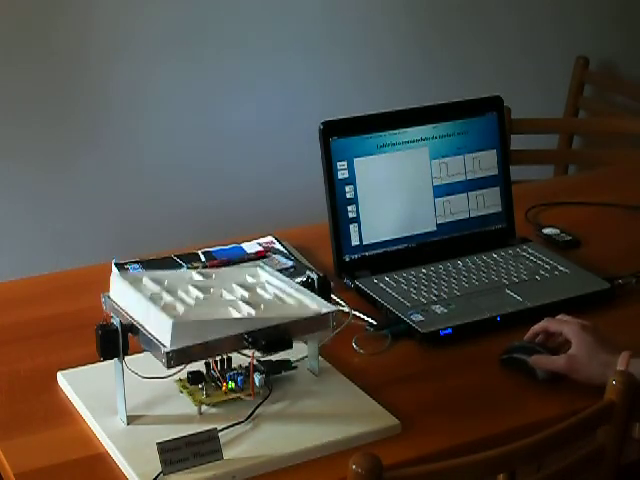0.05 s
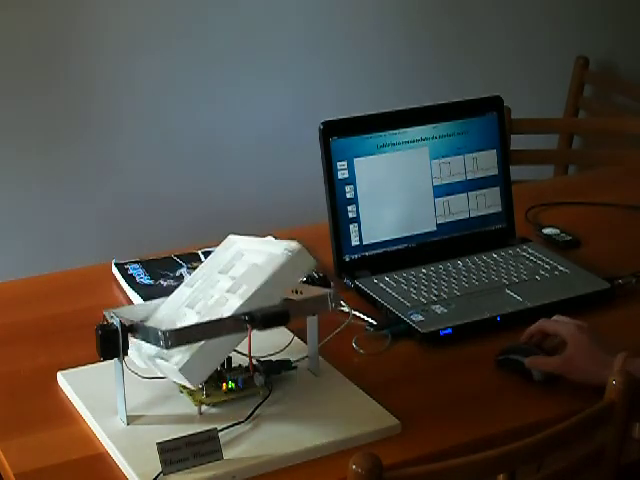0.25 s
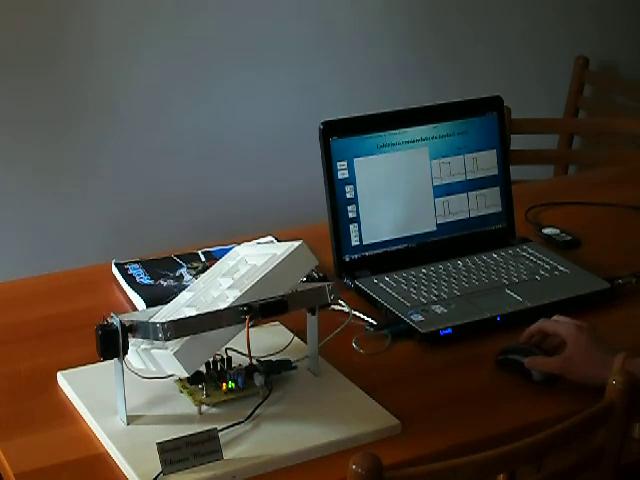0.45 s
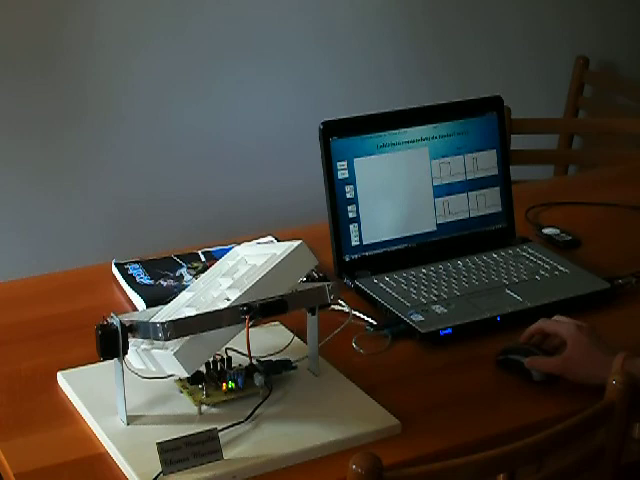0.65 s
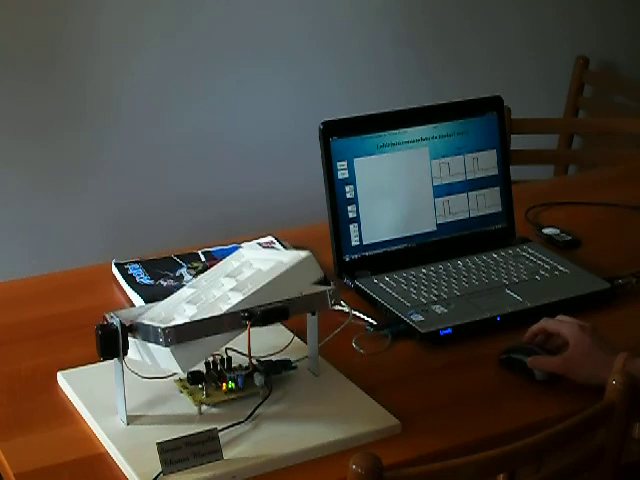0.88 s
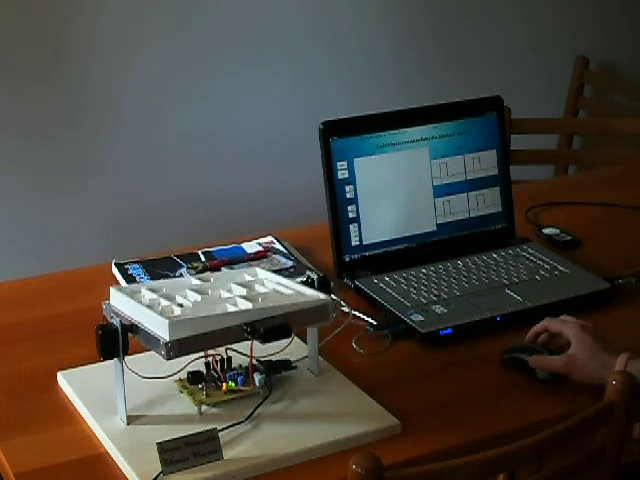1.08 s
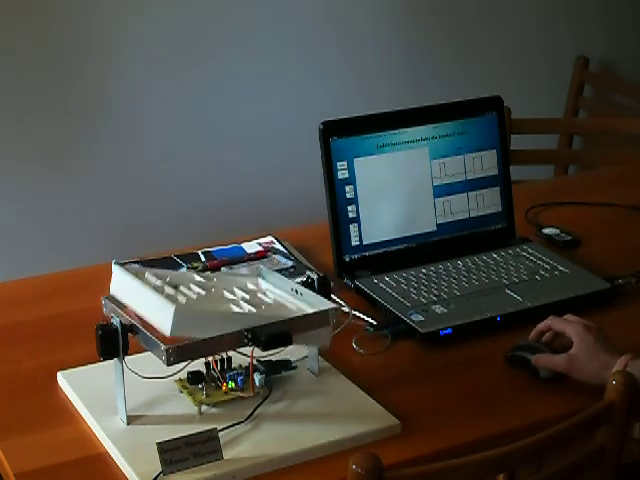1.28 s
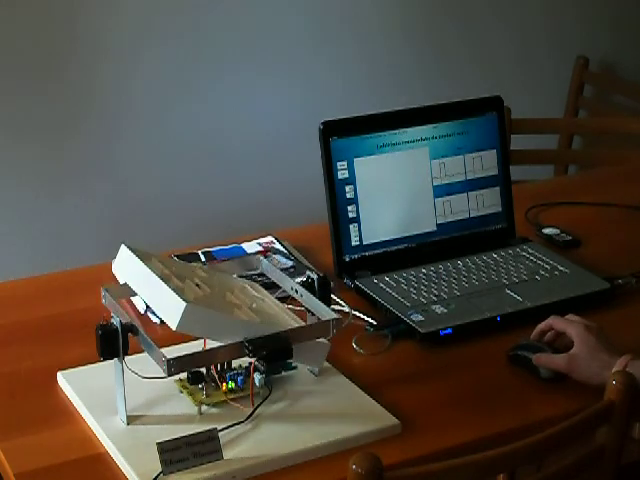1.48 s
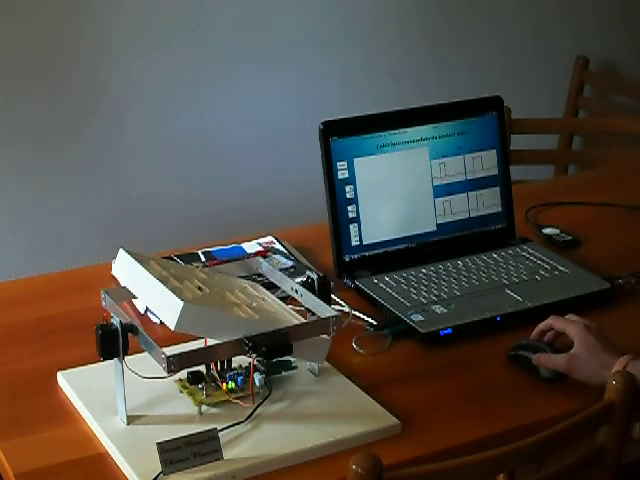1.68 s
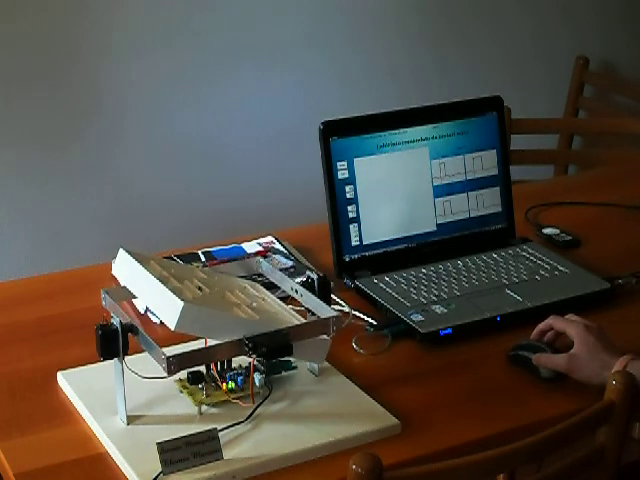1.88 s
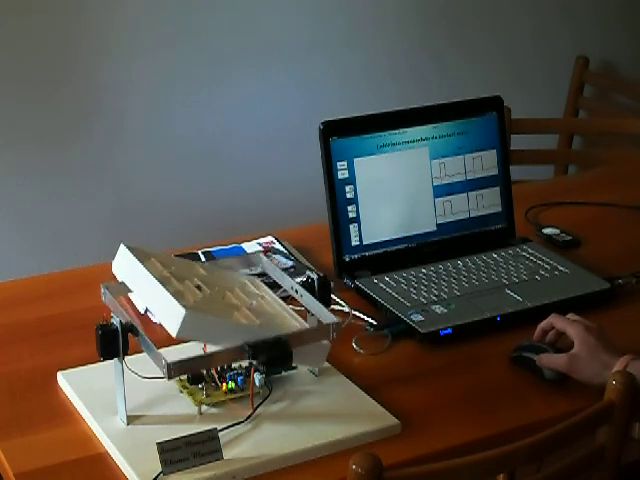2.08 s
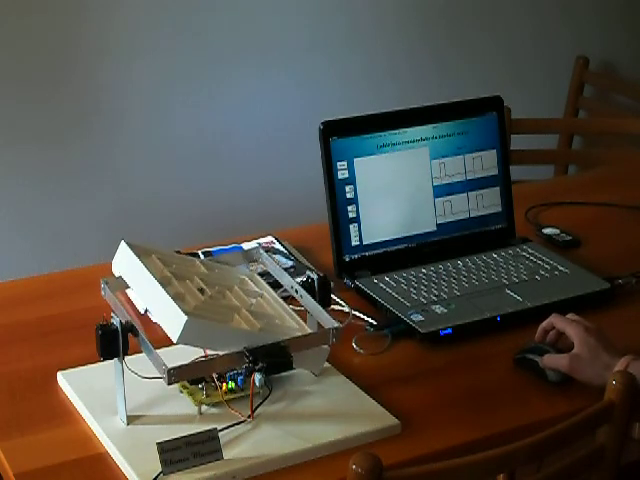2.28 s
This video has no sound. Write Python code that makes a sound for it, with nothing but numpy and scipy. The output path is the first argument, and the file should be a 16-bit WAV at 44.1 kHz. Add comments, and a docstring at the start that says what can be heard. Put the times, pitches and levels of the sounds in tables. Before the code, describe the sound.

Sharp knocks and rumble of a ball in a tilting maze, with brief motor whirring.

```python
"""Servo-driven ball maze.

Two small servos tilt a maze tray in a bare, echoing room; their gear teeth whirr in plastic cases.
A ball rumbles over the rough tray, scrapes along a wall and knocks against the walls,
each blow ringing the tray and followed by a quick rebound.
Underneath: low hum, faint hiss and a thin electronic whine."""
import sys
import numpy as np
from scipy import signal
from scipy.fft import rfft, irfft, next_fast_len
from scipy.io import wavfile
from scipy.ndimage import map_coordinates

SR = 44100
rng = np.random.default_rng(int(sys.argv[2]) if len(sys.argv) > 2 else 0)


def generate_wav(sig):
    """Save sig (samples, or channels by samples) to the path in sys.argv[1] as 16-bit PCM at SR."""
    pcm = np.round(np.clip(np.atleast_2d(sig).T, -1, 1) * 32767).astype(np.int16)
    wavfile.write(sys.argv[1], SR, pcm)


N = 108045
TIME_S = np.arange(N) / SR


def amp(db):
    """Decibels to gain."""
    return 10 ** (np.asarray(db) / 20)


def unit_rms(x):
    """Scale to rms 1."""
    return x / np.sqrt(np.mean(x ** 2) + 1e-20)


def curve(points, hz):
    """Interpolate (frequency [Hz], value) points on a log axis."""
    freqs, values = np.transpose(points)
    return np.interp(np.log(hz + 1), np.log(freqs + 1), values)


def bell(hz, centre_hz, octaves):
    """Gaussian of height 1 on a log-frequency axis."""
    return np.exp(-.5 * (np.log2((hz + 1) / centre_hz) / octaves) ** 2)


def envelope(points):
    """Gain per sample from (time [s], level [dB]) points."""
    return amp(np.interp(TIME_S, *np.transpose(points)))


def wobble(knots_per_s):
    """Smooth random curve."""
    return map_coordinates(rng.standard_normal(1000), [knots_per_s * TIME_S], mode="wrap")


def coloured(x, db_at):
    """Minimum-phase filter with gain db_at(hz)."""
    size = 2 * next_fast_len(len(x))
    hz = np.fft.rfftfreq(size, 1 / SR)
    cepstrum = irfft(np.log(amp(db_at(hz))))
    cepstrum[1:size // 2] *= 2
    cepstrum[size // 2 + 1:] = 0
    return irfft(rfft(x, size) * np.exp(rfft(cepstrum)))[:len(x)]


# Hiss spectrum: (frequency [Hz], gain [dB])
HISS_SPECTRUM = [(20, -2.5), (45, 5), (90, -0.5), (200, -7), (400, -13.5), (1000, -16), (2000, -19),
                 (3200, -20), (5000, -22), (10000, -22.5)]
# Hum and whine partials: (frequency [Hz], rms level [dB])
HUM_TONES = [(30, -50.5), (60, -66.5), (126, -76.5)]
WHINE_TONES = [(7140, -65.5), (7852, -63), (7882, -79), (7912, -86)]


def background(hiss_db=-52, waver_rad=0.11):
    """Steady hiss under a hum and whine that waver slightly in phase."""
    hiss = coloured(rng.standard_normal(N), lambda hz: curve(HISS_SPECTRUM, hz))
    out = amp(hiss_db) * unit_rms(hiss)
    for hz, db in HUM_TONES + WHINE_TONES:
        waver = waver_rad * wobble(knots_per_s=6.3)
        phase = 2 * np.pi * (hz * TIME_S + rng.random())
        out += amp(db) * np.sqrt(2) * np.sin(phase + waver)
    return out


# Room decay: (frequency [Hz], T60 [s])
ROOM_DECAY = [(200, 0.35), (700, 0.55), (3000, 0.62), (6000, 0.52), (10000, 0.53)]


def room_tail(build_s=0.0054):
    """Diffuse echo of energy 1, lasting longest near 3 kHz."""
    hz, t, spectra = signal.stft(rng.standard_normal(SR), SR, nperseg=256)
    decay = amp(-60 * t / curve(ROOM_DECAY, hz)[:, None])
    tail = signal.istft(spectra * decay, SR, nperseg=256)[1][:SR]
    tail *= 1 - np.exp(-TIME_S[:SR] / build_s)
    return tail / np.linalg.norm(tail)


def in_room(x, wet_db):
    """Direct sound plus echo, at the same total power."""
    echo = signal.fftconvolve(x, room_tail())[:N]
    return (x + amp(wet_db) * echo) / np.hypot(1, amp(wet_db))


# Whirr envelope: (time [s], level [dB])
SERVO_LEVEL = [(0, -60), (.07, -50), (.08, -40), (.105, -45.5), (.112, -35), (.132, -37.5), (.175, -33),
               (.235, -33), (.26, -37.5), (.33, -42.5), (.4, -73), (2.0, -89), (2.027, -49), (2.065, -74),
               (2.082, -39), (2.125, -50), (2.158, -42), (2.2, -57), (2.3, -84)]
# Gear spectrum: (frequency [Hz], gain [dB])
GEAR_SPECTRUM = [(300, -36), (1800, -24.5), (2900, -8.5), (5200, -7), (5700, 2), (6200, 2), (6700, -2.5),
                 (8200, -4), (9500, 2), (10200, -1.5)]


def servos(teeth_per_s=950, tooth_scatter=0.31, case_t60_s=0.0064, flutter_db=1.5):
    """Each uneven gear tooth rasps briefly in the small plastic case; the load flutters."""
    gaps_s = np.exp(tooth_scatter * rng.standard_normal(4000)) / teeth_per_s
    onsets = (np.cumsum(gaps_s) * SR).astype(int)
    teeth = np.bincount(onsets, minlength=N)[:N]
    case_decay = amp(-60 * TIME_S[:SR] / case_t60_s)
    rasp = signal.fftconvolve(teeth, case_decay)[:N] * rng.standard_normal(N)
    whirr = unit_rms(coloured(rasp, lambda hz: curve(GEAR_SPECTRUM, hz)))
    flutter = amp(flutter_db * wobble(knots_per_s=90))
    return whirr * envelope(SERVO_LEVEL) * flutter


# Tray resonances: (frequency [Hz], width [Hz], lift [dB])
TRAY_MODES = [(296.5, 43, 7), (480, 31, 6), (687, 89, 12), (898, 33, 6), (1016, 100, 4), (1355, 34, 5.5),
              (1644, 22, 6), (1810, 27, 6), (1942, 50, 8), (2870, 75, 5), (3510, 75, 2.5), (5380, 250, 4),
              (6100, 120, 3.5), (6600, 70, 1.5)]


def tray_db(hz):
    """Summed lift of the tray's resonances."""
    return sum(db / (1 + (2 * (hz - centre) / width) ** 2) for centre, width, db in TRAY_MODES)


def bumps(per_s=2500):
    """Tiny random contacts of the ball with the rough tray."""
    return (rng.random(N) < per_s / SR) * rng.standard_normal(N)


# Corridor runs: (start [s], end [s], final level [dB], rise over the run [dB],
#   corridor resonance [Hz], its lift [dB], treble gain [dB])
RUNS = [(.10, 0.39, -52, 13, 736, 11, 3.5), (0.345, 0.537, -38.5, 15, 760, 5, 3),
        (0.564, 0.769, -46.5, -6.5, 296, 10, 7.5), (0.765, 0.964, -44, -7, 539, 11.5, 4.5),
        (1.059, 1.358, -44.5, -2, 930, 2.5, 6.5), (1.367, 1.686, -47, -9, 518, 10, 1.5),
        (2.255, 2.47, -51, 5, 560, 10, -5.5)]
# Rolling spectrum: (frequency [Hz], gain [dB])
ROLL_SPECTRUM = [(100, -32.5), (220, -3.5), (550, -3), (1000, -4), (1400, -8.5), (3400, -20), (4600, -20),
                 (10000, -25)]


def rolling(edge_s=0.013):
    """The rolling ball makes each corridor rumble at its own pitch, swelling or fading."""
    out = np.zeros(N)
    for start_s, end_s, db, rise_db, corridor_hz, lift_db, treble_db in RUNS:
        def colour_db(hz):
            treble = curve([(780, 0), (2500, treble_db)], hz)
            corridor = lift_db * bell(hz, corridor_hz, octaves=0.077)
            return curve(ROLL_SPECTRUM, hz) + treble + tray_db(hz) + corridor

        rumble = unit_rms(coloured(bumps(), colour_db))
        inside_s = np.minimum(TIME_S - start_s, end_s - TIME_S)
        gate = np.clip(inside_s / edge_s + .5, 0, 1)
        out += rumble * gate * envelope([(start_s, db - rise_db), (end_s, db)])
    return out


# Scrape envelope: (time [s], level [dB])
SCRAPE_LEVEL = [(.33, -110), (.40, -40.5), (.44, -40.5), (.50, -40), (.545, -45), (.575, -38), (.68, -48),
                (.85, -110)]
# Scrape spectrum: (frequency [Hz], gain [dB])
SCRAPE_SPECTRUM = [(200, -49), (740, -4.5), (1130, -3), (1370, 8), (1600, -15.5), (1950, 4), (3200, -3),
                   (4500, -5.5), (10000, -20)]


def scraping():
    """The ball rubs along a wall, harsher than rolling."""
    rub = coloured(bumps(), lambda hz: curve(SCRAPE_SPECTRUM, hz) + tray_db(hz))
    return unit_rms(rub) * envelope(SCRAPE_LEVEL)


# Wall hits: (time [s], relative level [dB], thud [dB], click [dB], body [Hz], ring [Hz],
#   ring lift [dB], notch [Hz], notch depth [dB], rebound delay [s], rebound gain [dB])
WALL_HITS = [ (0.3622, -31.5, -9.5, -10.5, 750, 1340, 7, 1150, 26, 0.0078, -6.5),
             (.5004, -20, -10.5, -3.5, 880, 4220, 5.5, 530, 21, 0.0029, 1),
             (.5370, -29.5, 1, 2, 215, 3200, 9.5, 547, 14, 0.0083, -1),
             (.6007, -28, -11, 1, 890, 3080, 1.5, 5100, 13, 0.0045, -19),
             (0.674, -34, -4.5, -7, 875, 3150, 3, 5500, -2, .004, -9),
             (0.7793, -24, -12.5, -2.5, 554, 2770, 7, 3020, 12.5, 0.0097, -3),
             (0.8914, -33, -10, -2.5, 670, 7300, 8.5, 4800, -1, .009, -2),
             (.9603, -28.5, 0, 6, 660, 916, 10.5, 4070, 4, .008, -3),
             (0.9951, -30.5, -2.5, 0.5, 1020, 3460, 4.5, 4260, 3, 0.0031, -7),
             (1.0852, -35.5, -13, 4.5, 930, 3380, 2, 4350, 32, .004, -18),
             (1.3488, -28.5, -11, 0, 660, 2660, 5.5, 7500, 4, 0.013, -18),
             (1.4331, -27, -12, 2.5, 527, 2300, 6.5, 4700, 5, 0.011, -5),
             (1.5381, -32, -14.5, -2.5, 520, 2360, 5, 4570, 4, 0.009, -15),
             (1.6008, -37, -18, -6.5, 526, 2330, 7.5, 4670, 1, 0.0045, -17)]
# Contact spectrum: (frequency [Hz], gain [dB])
CONTACT_SPECTRUM = [(100, -17.5), (220, -6.5), (500, -7), (1100, 0), (2200, -0.5), (3500, 0), (4700, -6),
                    (5600, -1), (7800, -7.5), (10000, -9)]


def knocks(gain_db=33.5, ring_t60_s=0.058, room_db=2.5):
    """Each blow and its quick rebound ring the tray briefly and set off the room."""
    def decay(age_s):
        return (age_s >= 0) * amp(-60 * np.abs(age_s) / ring_t60_s)

    out, t = np.zeros(N + SR), TIME_S[:SR]
    for (at_s, db, thud_db, click_db, body_hz, ring_hz, ring_db,
         notch_hz, notch_db, rebound_s, rebound_db) in WALL_HITS:
        def colour_db(hz):
            hardness = curve([(780, thud_db), (2980, 0), (7200, click_db)], hz)
            # The spot struck favours two resonances and misses a third.
            spot = (8 * bell(hz, body_hz, octaves=0.14)
                    + ring_db * bell(hz, ring_hz, octaves=0.072)
                    - notch_db * bell(hz, notch_hz, octaves=0.095))
            return curve(CONTACT_SPECTRUM, hz) + hardness + tray_db(hz) + spot

        rebound = amp(rebound_db) * decay(t - rebound_s)
        ring = rng.standard_normal(SR) * np.hypot(decay(t), rebound)
        blow = ring / np.linalg.norm(ring) + amp(room_db) * room_tail()
        onset = round(at_s * SR)
        out[onset:onset + SR] += amp(db + gain_db) * coloured(blow, colour_db)
    return out[:N]


def scene():
    """Mono mix at one microphone."""
    out = background()
    out += in_room(servos(), wet_db=-0.5)
    out += in_room(rolling() + scraping(), wet_db=1.5)
    out += knocks()
    return out[None]


# Microphone response: (frequency [Hz], gain [dB])
MIC_RESPONSE = [(10000, -0.5), (10450, -8.5), (11000, -24.5), (11900, -21.5), (12350, -37), (12750, -55)]
BAND_LIMIT_HZ = 12750


def record(dry):
    """The microphone dulls the top treble and passes nothing above its band limit."""
    size = next_fast_len(N + SR // 2)
    hz = np.fft.rfftfreq(size, 1 / SR)
    response = amp(curve(MIC_RESPONSE, hz)) * (hz < BAND_LIMIT_HZ)
    return irfft(rfft(dry, size) * response, size)[:, :N]


dry = scene()
out = record(dry)
generate_wav(out)
```